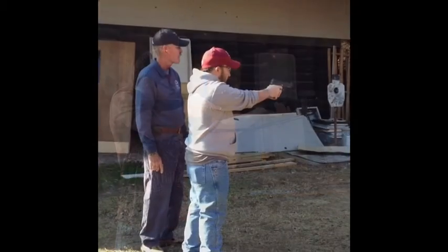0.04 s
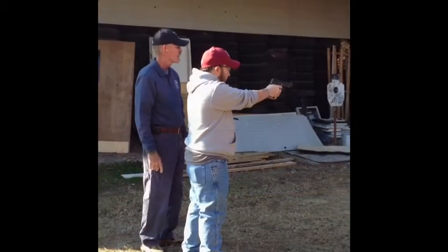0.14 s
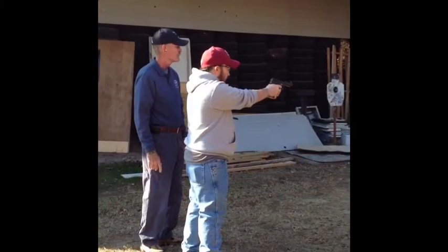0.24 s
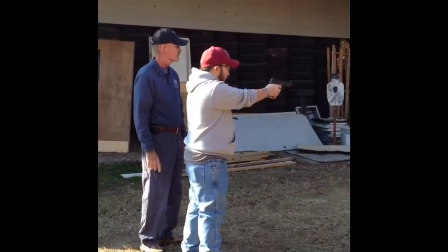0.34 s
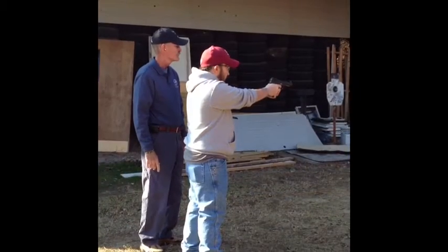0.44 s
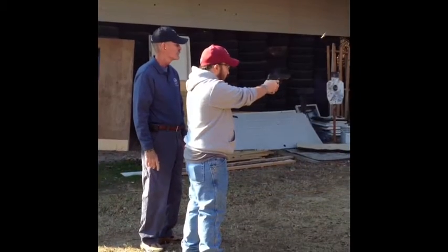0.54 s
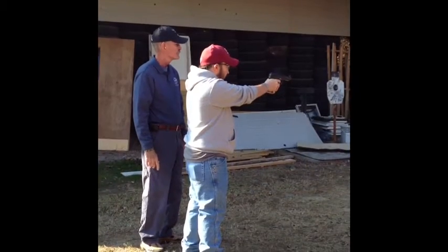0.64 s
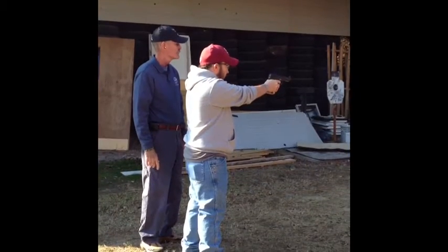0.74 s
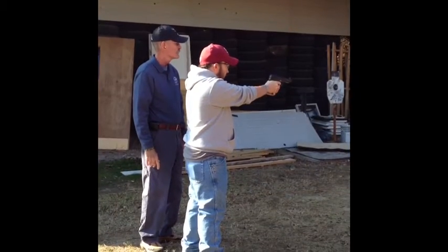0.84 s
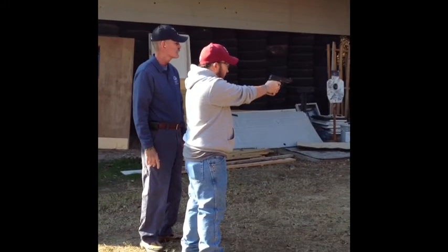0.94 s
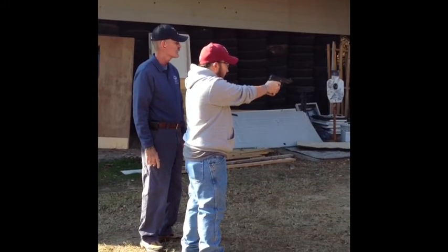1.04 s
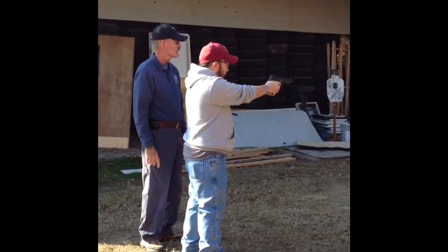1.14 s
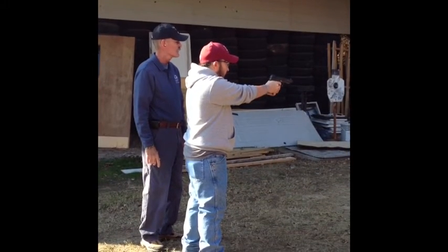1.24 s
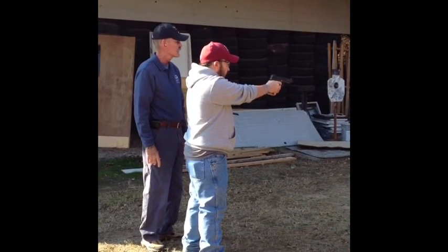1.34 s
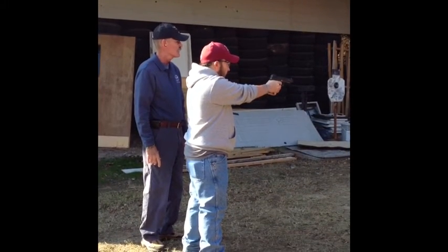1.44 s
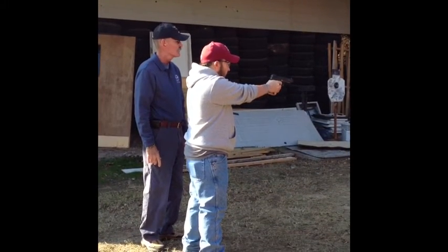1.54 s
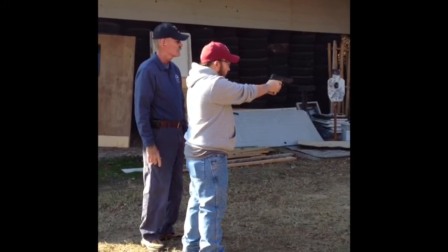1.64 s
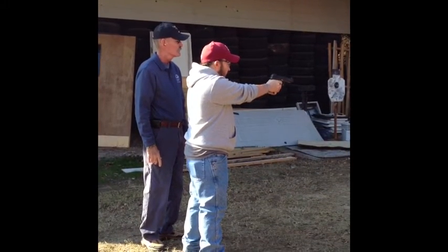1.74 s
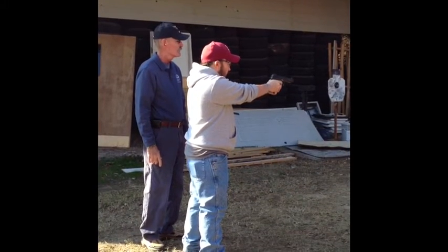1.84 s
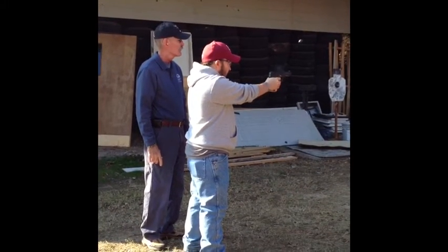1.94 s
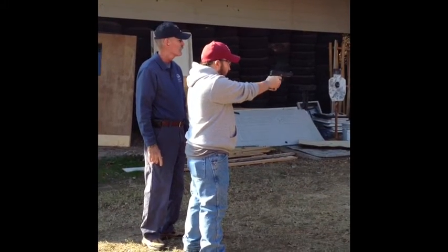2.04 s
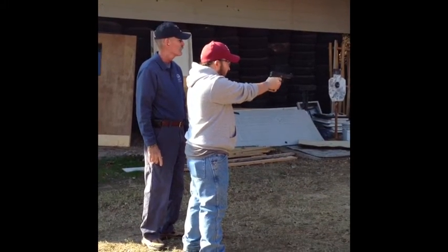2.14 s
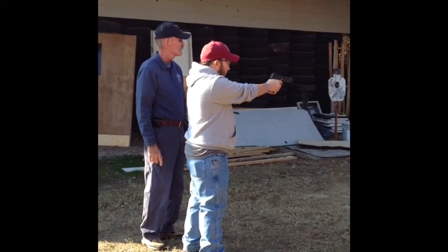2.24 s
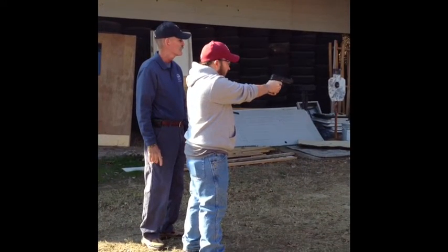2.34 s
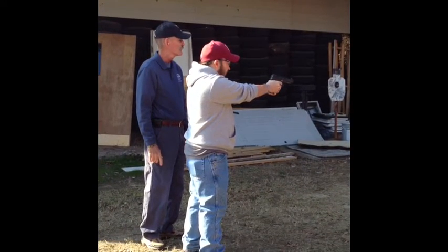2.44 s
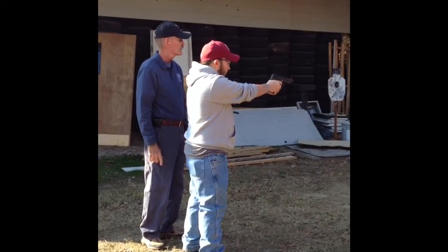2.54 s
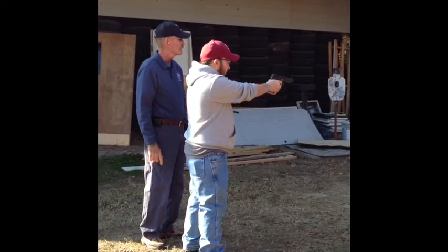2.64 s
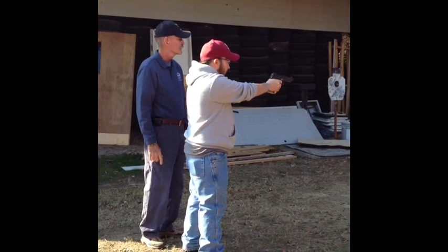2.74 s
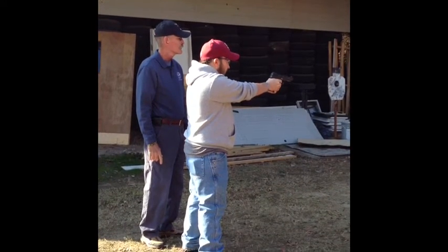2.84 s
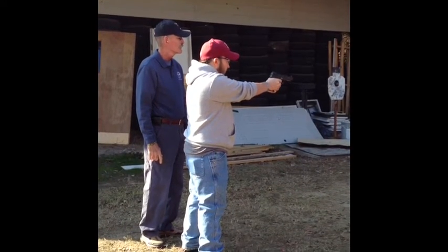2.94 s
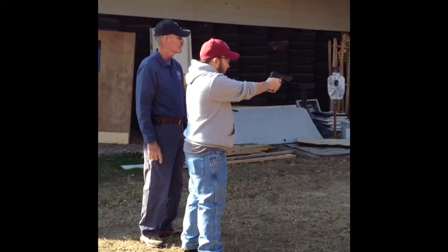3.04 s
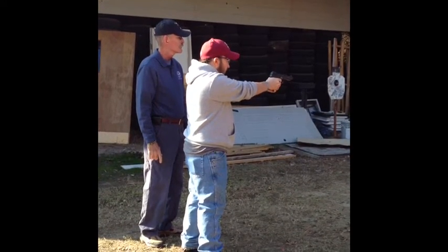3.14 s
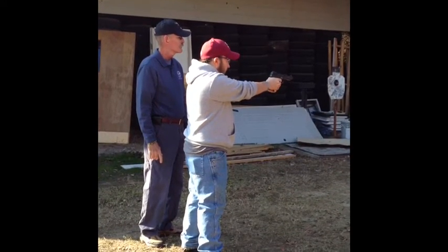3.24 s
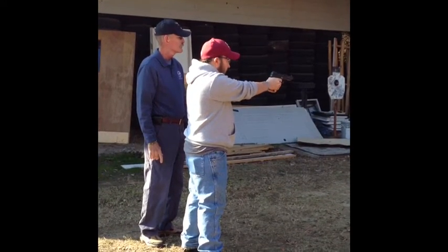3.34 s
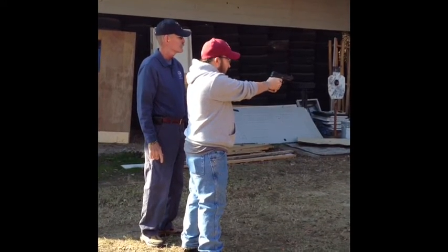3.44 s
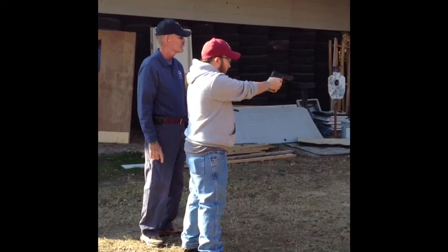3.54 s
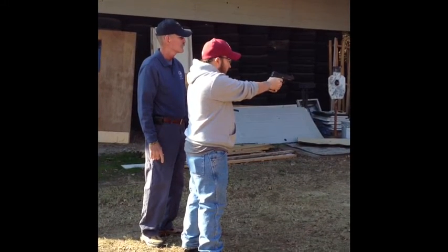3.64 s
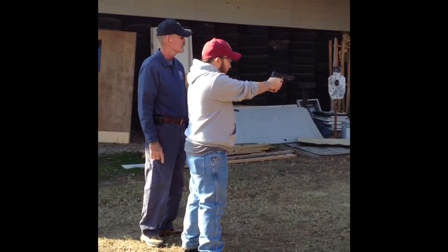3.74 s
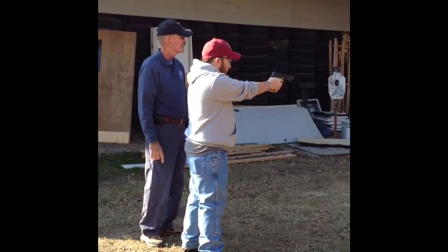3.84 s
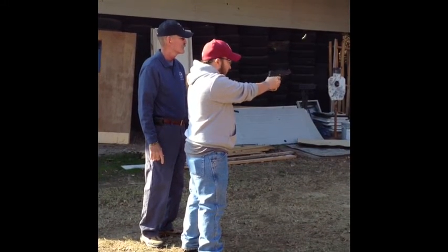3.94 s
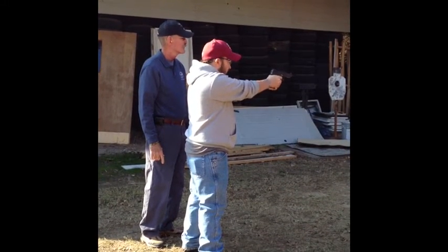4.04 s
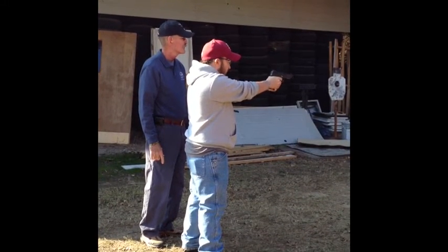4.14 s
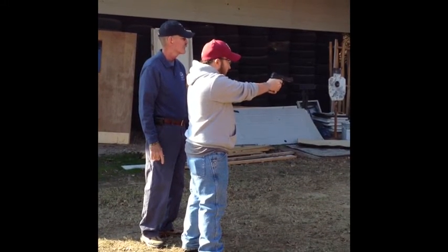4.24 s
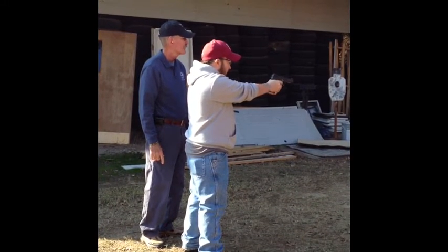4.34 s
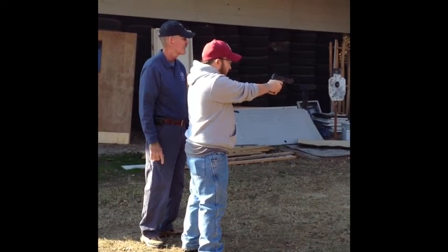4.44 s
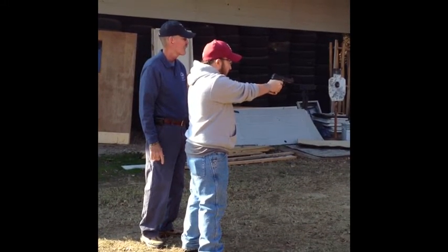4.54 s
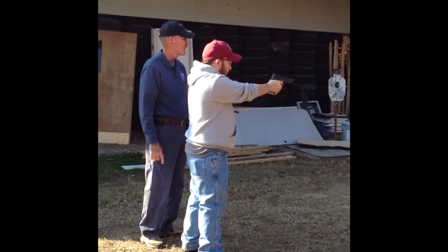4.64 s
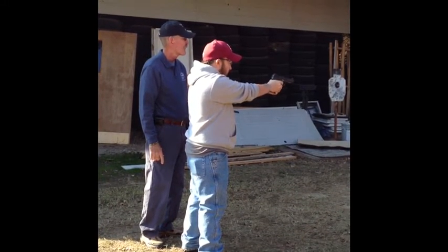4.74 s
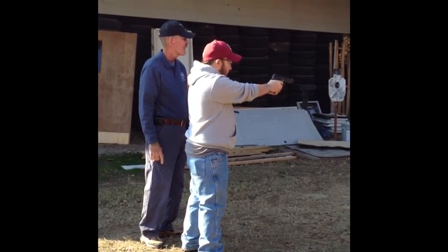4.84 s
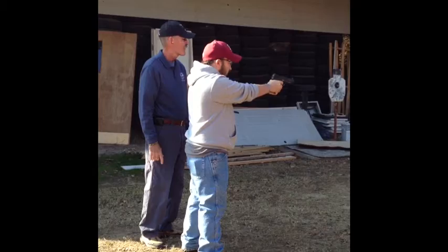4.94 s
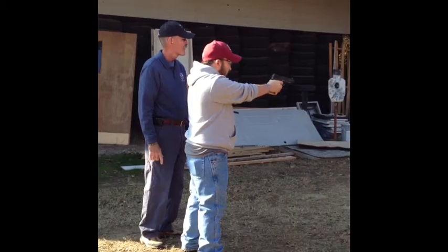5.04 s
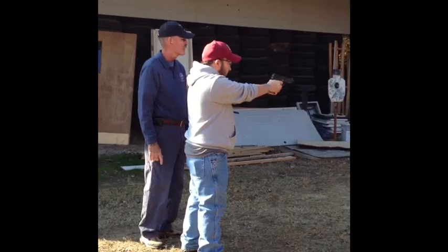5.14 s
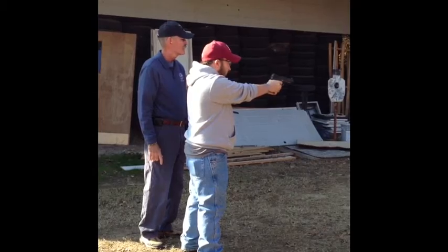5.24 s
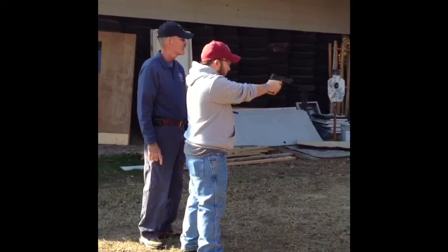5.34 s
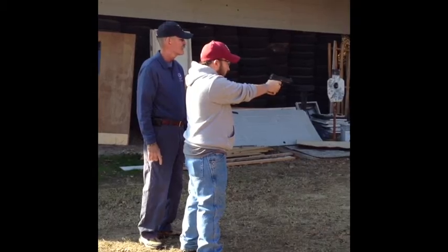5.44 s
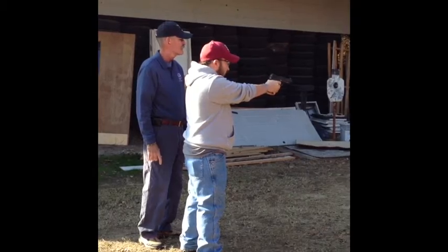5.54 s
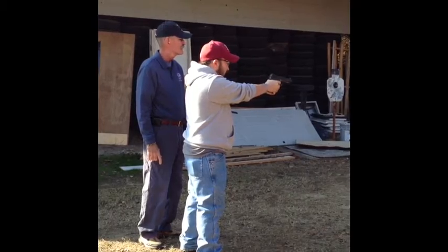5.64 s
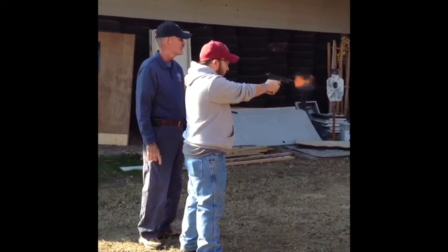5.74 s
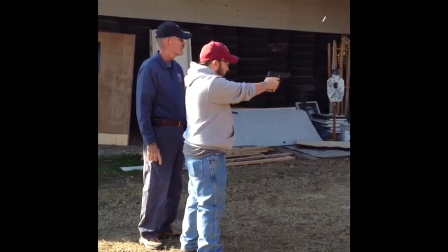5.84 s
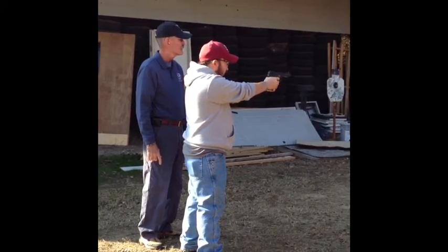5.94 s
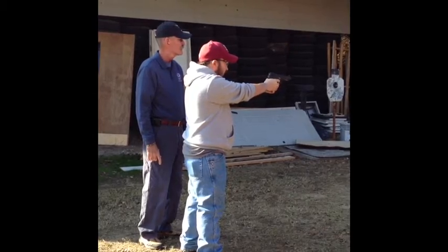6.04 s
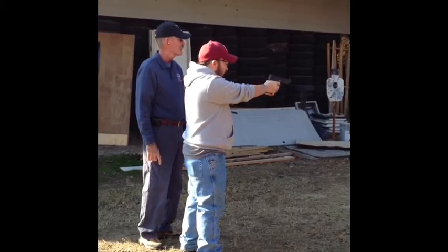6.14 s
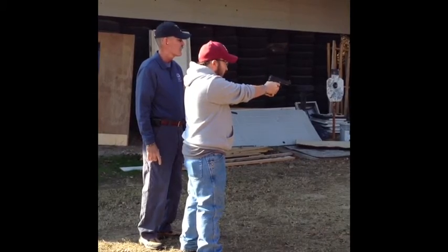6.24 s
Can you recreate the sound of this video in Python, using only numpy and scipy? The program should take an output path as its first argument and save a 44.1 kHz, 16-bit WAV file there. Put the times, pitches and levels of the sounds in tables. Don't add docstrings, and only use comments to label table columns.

```python
import sys
import numpy as np
from scipy import signal
from scipy.io import wavfile

SR = 44100
rng = np.random.default_rng(int(sys.argv[2]) if len(sys.argv) > 2 else 0)


def generate_wav(sig):
    pcm = np.round(np.clip(np.atleast_2d(sig).T, -1, 1) * 32767).astype(np.int16)
    wavfile.write(sys.argv[1], SR, pcm)


def volts_from_decibels(level):
    exponent = np.asarray(level, float) / 20
    return 10 ** exponent


N = 277830

SHOT_TIMES_S = [.49245, 1.91249, 3.90988, 5.76880]
# [delay/ms, level/dB, low-pass f/Hz]
FIRST_ARRIVALS = [
    (0, 0, 2480),
    (2.54, -5.8, 3960),
    (4.79, 8.4, 131),
]


def rms_one(x):
    return x / np.sqrt(np.mean(x ** 2) + 1e-20)


def at_hz(points, hz):
    table_hz, values = np.array(points).T
    return np.interp(np.log(hz), np.log(table_hz), values)


def cut(x, hz, kind="low"):
    return signal.sosfilt(signal.butter(2, hz, kind, fs=SR, output="sos"), x)


def resonant(x, hz, width_hz):
    r = np.exp(-np.pi * width_hz / SR)
    c = 2 * r * np.cos(2 * np.pi * hz / SR)
    return signal.lfilter([1 - c + r * r], [1, -c, r * r], x)


def drift(rate_hz, size):
    knots = rng.standard_normal(400)
    return np.interp(np.arange(size) / SR * rate_hz, np.arange(400), knots)


def swell(t, start_s, rise_s):
    return 1 - np.exp(-np.maximum(t - start_s, 0) / rise_s)


def decay(t, start_s, t60_s):
    return volts_from_decibels(-60 * np.maximum(t - start_s, 0) / t60_s)


def bands(spectrum, size, patchy_db=0.):
    band_edges_hz = 42 * 2 ** np.arange(0, 8.7, 1 / 3)
    centres_hz = np.sqrt(band_edges_hz[1:] * band_edges_hz[:-1])
    top_hz = min(spectrum[-1][0] * 2, 20000)
    used = np.flatnonzero((centres_hz > spectrum[0][0]) & (centres_hz < top_hz))
    white = rng.standard_normal((2, size + 4000))
    rows = []
    for k in used:
        band = signal.butter(2, band_edges_hz[k:k + 2], "band", fs=SR, output="sos")
        noise = signal.sosfilt(band, white[k % 2])[4000:]
        rows.append(noise * volts_from_decibels(at_hz(spectrum, centres_hz[k]) + patchy_db * drift(5.5, size)))
    return np.array(rows) / np.std(np.sum(rows, axis=0)), centres_hz[used]


def dying(spectrum, t, hold_s):
    # [f/Hz, t60/s]
    shed_t60 = [(80, .2), (120, 0.083), (170, 0.31), (300, .33), (750, 0.34), (1200, 0.25), (2500, 0.35),
                (6000, 0.24), (12000, .25)]
    rows, centres_hz = bands(spectrum, len(t), patchy_db=2.5)
    t60_s = at_hz(shed_t60, centres_hz)[:, None]
    return np.sum(rows * decay(t, hold_s, t60_s), axis=0)


def series(start_ms, every_ms, db, loss_db, hz, count):
    return [(start_ms + every_ms * k, db - loss_db * k, hz) for k in range(count)]


def echoed(x, table):
    at = np.arange(len(x))
    total = np.zeros(len(x))
    for delay_ms, db, hz in table:
        delayed = np.interp(at - delay_ms * SR / 1000, at, x, left=0)
        total += volts_from_decibels(db) * cut(delayed, hz)
    return total


def duck_db():
    dip_db, recover_db_per_s = -6, 3
    t = np.arange(N) / SR
    dips = [np.minimum(dip_db + recover_db_per_s * (t - s), 0) * (t > s) for s in SHOT_TIMES_S]
    return np.min(dips, axis=0)


def shots():
    # [blast level/dB, crack level/dB]
    shot_levels = [(0.43, -20), (-0.02, -20), (1.06, -18), (-0.3, -20.5)]
    out = np.zeros(N + 2 * SR)
    t = np.arange(round(1.4 * SR)) / SR
    short = t[:SR // 2]
    answer = far_returns(t)
    answer[:len(short)] += volts_from_decibels(-22.5) * shed_scatter(short)
    answer = cut(cut(answer, 105, "high"), 60, "high")
    answer[:len(short)] += blast(short)
    for s, (blast_db, crack_db) in zip(SHOT_TIMES_S, shot_levels):
        i = round(s * SR)
        out[i:i + len(t)] += volts_from_decibels(blast_db) * answer
        out[i:i + len(short)] += volts_from_decibels(blast_db - 33.5) * shed_scatter(short)
        out[i:i + len(short)] += volts_from_decibels(crack_db + 1.5) * crack(short)
    return out[:N]


def blast(t):
    # [f/Hz, width/Hz, level/dB, sign]
    port_modes = [(809, 340, 3.0, 1), (373, 148, .3, 1), (1357, 130, -14, -1)]
    # [delay/ms, level/dB, low-pass f/Hz]
    shed_echoes = [
        (21.0, -8.7, 3000),
        (24.3, -3, 260),
        (28.9, -13, 1000),
        (33.27, -14, 2500),
        (34.1, -16, 800),
        (42.75, -8, 300),
        (62.95, -16, 300),
    ]
    # [delay/ms, level/dB, low-pass f/Hz]
    far_echoes = [
        (382.7, -32, 310),
        (383.6, -48, 1500),
        (406.3, -30.5, 480),
        (408.63, -25.5, 300),
        (410.86, -41.5, 1000),
        (415.6, -27.9, 300),
    ]
    positive_s, fade_per_phase = .000615, 1.72
    through_db, mic_low_hz = -6.0, 137
    thump_db, thump_hz = -5.5, 55

    phase = t / positive_s
    wave = (1 - phase) * np.exp(-fade_per_phase * phase) + 1e-18
    heard = volts_from_decibels(through_db) * wave
    for hz, width_hz, db, sign in port_modes:
        heard = heard + sign * volts_from_decibels(db) * resonant(wave, hz, width_hz)
    bare = cut(cut(heard, mic_low_hz, "high"), mic_low_hz, "high")
    first = echoed(bare, FIRST_ARRIVALS)
    thump = volts_from_decibels(thump_db) * cut(wave, thump_hz)
    flutter = series(38.74, 4.03, db=-8.5, loss_db=1.2, hz=320, count=11)
    trunks = series(424.6, 8.3, db=-33.5, loss_db=.4, hz=230, count=8)
    return first + thump + echoed(first, shed_echoes + flutter) + echoed(bare, far_echoes + trunks)


def crack(t):
    # [f/Hz, level/dB per Hz]
    crack_spectrum = [(800, -34.5), (1400, -4), (2500, -15.5), (4500, -17), (6500, -22.5), (9000, -34.5),
                      (11500, -42), (14500, -30.5)]
    slap_s = .3826
    fronts = bands(crack_spectrum, len(t))[0].sum(axis=0)
    bounce_s = FIRST_ARRIVALS[1][0] / 1000
    direct = decay(t, 0, .009) * (t >= 0)
    bounce = volts_from_decibels(-2.5) * decay(t, bounce_s, .009) * (t >= bounce_s)
    slap = decay(t, slap_s, .014) * (t >= slap_s)
    return (direct + bounce) * fronts + volts_from_decibels(-42) * cut(slap * fronts, 2600)


def shed_scatter(t):
    # [f/Hz, level/dB per Hz]
    low_spectrum = [(35, -51.5), (60, -28), (133, -11.5), (265, 0.5), (446, -18), (603, -8.5), (721, -16.5),
                    (816, -8.5), (1250, -11.5), (1600, -44), (2080, -60), (3520, -120)]
    # [f/Hz, level/dB per Hz]
    high_spectrum = [(1200, -30.5), (1800, -5), (2400, -5), (4000, -10), (6300, -10), (8500, -21),
                     (11000, -27), (14500, -25)]
    slap_db, slaps_per_s = 2, 100
    clump_db, clumps_per_s = 1, 220
    shelf_hz = 1540

    thin = swell(t, .003, .001)
    walls = swell(t, .022, .006)
    late = swell(t, .079, .006)
    burst = np.exp(-((t - .032) / .004) ** 2)
    slaps = volts_from_decibels(slap_db * drift(slaps_per_s, len(t)))
    clumps = volts_from_decibels(clump_db * drift(clumps_per_s, len(t)))
    lows = dying(low_spectrum, t, hold_s=0.029) * (0.41 * thin + 0.69 * walls + 0.093 * late) * slaps
    highs = dying(high_spectrum, t, hold_s=0.02) * (0.39 * thin + .35 * walls + .45 * burst) * clumps
    lows = lows + volts_from_decibels(-8.5) * cut(lows, 620, "high")
    return cut(cut(lows, shelf_hz), shelf_hz) + volts_from_decibels(-19) * highs


def far_returns(t):
    # [f/Hz, level/dB per Hz]
    far_spectrum = [(41, -63), (70, -12), (114, -16.5), (166, 5.5), (211, -8.5), (274, 1.5), (453, -12.5),
                    (986, -2), (1400, -36.5), (1820, -53), (3080, -120)]
    # [delay/s, rise/s, level/dB, t60/s, level of part above 600 Hz/dB]
    far_swells = [(.06, 0.037, -43, 1.03, -7), (0.384, 0.0012, -72.5, 0.063, 15.5),
                  (0.424, 0.03, -49.5, 0.41, -14), (.47, 0.093, -65.5, 1.3, 1),
                  (.88, 0.0074, -78.5, 0.76, 11)]
    rows, centres_hz = bands(far_spectrum, len(t), patchy_db=4.5)
    dull = rows[centres_hz < 600].sum(axis=0)
    bright = rows[centres_hz >= 600].sum(axis=0)
    total = np.zeros(len(t))
    for start_s, rise_s, db, t60_s, bright_db in far_swells:
        envelope = swell(t, start_s, rise_s) * volts_from_decibels(db) * decay(t, start_s, t60_s)
        total += envelope * (dull + volts_from_decibels(bright_db) * bright)
    return total


def knocks():
    # [t/s, level/dB, f/Hz, t60/s]
    far_knocks = [(.0962, -45, 260, .022), (.0962, -56, 900, .008), (3.715, -64, 190, .08),
                  (5.545, -67, 190, .07)]
    t = np.arange(N) / SR
    total = np.zeros(N)
    for s, db, hz, t60_s in far_knocks:
        ring = np.sin(2 * np.pi * hz * (t - s))
        total += volts_from_decibels(db) * decay(t, s, t60_s) * swell(t, s, 0.00037) * ring
    return total


def background():
    # [f/Hz, level/dB per Hz]
    rumble_spectrum = [(29, -46), (60, -20), (108, -7), (172, 2.5), (239, -4), (405, -8.5), (516, -10),
                       (791, -12.5), (1500, -20), (1950, -54.5), (3300, -120)]
    rumble_db, gain_share = -69, .7
    engine_hz, engine_db, engine_s, engine_wide_s = 187, -68.5, 1.66, .19
    t = np.arange(N) / SR
    noise = bands(rumble_spectrum, N, patchy_db=1.0)[0].sum(axis=0)
    rumble = volts_from_decibels(rumble_db + gain_share * duck_db()) * noise
    note = resonant(resonant(rng.standard_normal(N), engine_hz, 9), engine_hz, 9)
    passing = np.exp(-((t - engine_s) / engine_wide_s) ** 2)
    return rumble + volts_from_decibels(engine_db) * passing * rms_one(note)


def mic_hiss():
    # [f/Hz, level/dB per Hz]
    hiss_spectrum = [(710, -25.5), (1200, -3.5), (1520, -1.5), (2750, -1.5), (2960, -2), (4830, -4),
                     (6710, -4.5), (9940, -13.5), (13400, -6), (15200, -2.5)]
    return volts_from_decibels(-74.5 + 4.0 + duck_db()) * bands(hiss_spectrum, N)[0].sum(axis=0)


def scene():
    return (shots() + cut(knocks() + background(), 60, "high"))[None]


def band_limit(x):
    return signal.sosfilt(signal.butter(12, 16540, fs=SR, output="sos"), x)


def record(dry):
    top_cut = signal.cheby2(10, 28, 15550, fs=SR, output="sos")
    filtered = signal.sosfilt(top_cut, dry + mic_hiss())
    limited = filtered / (1 + filtered ** 12) ** (1 / 12)
    return band_limit(limited)


dry = scene()
out = record(dry)
generate_wav(out)
```